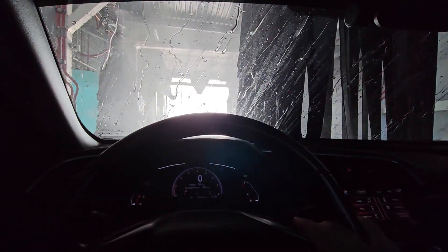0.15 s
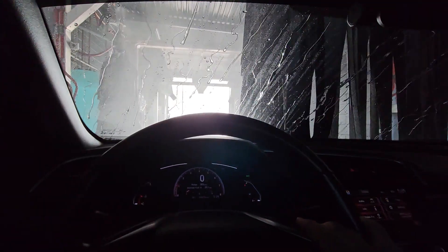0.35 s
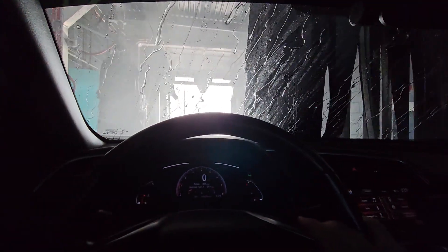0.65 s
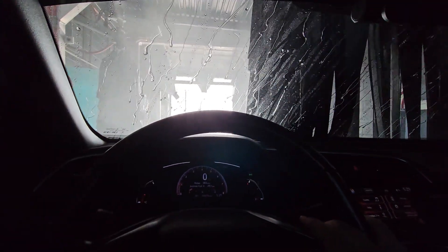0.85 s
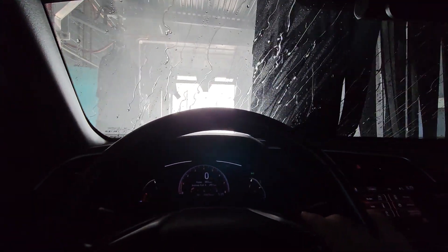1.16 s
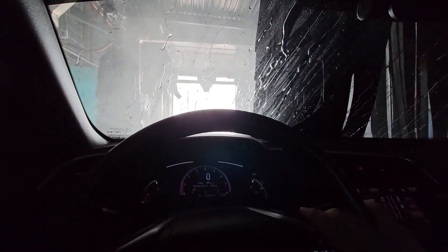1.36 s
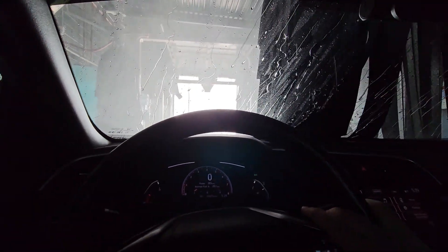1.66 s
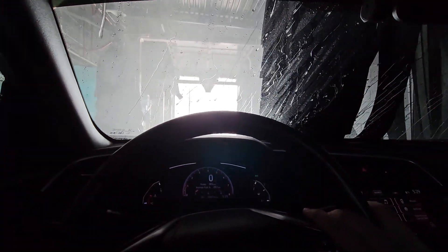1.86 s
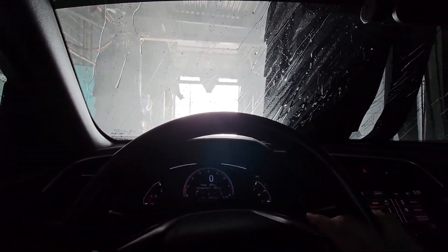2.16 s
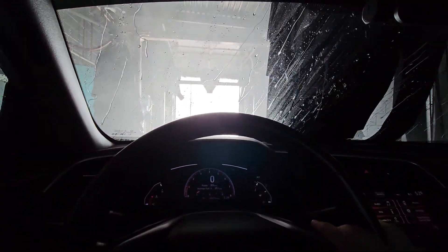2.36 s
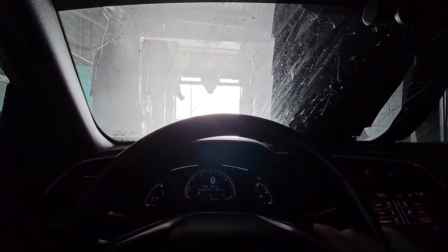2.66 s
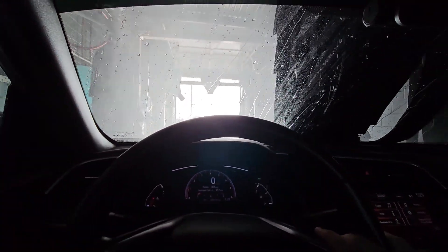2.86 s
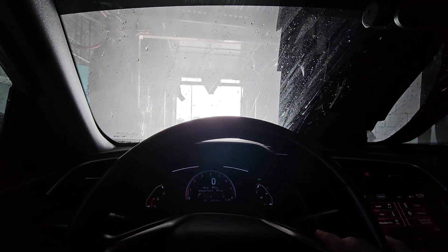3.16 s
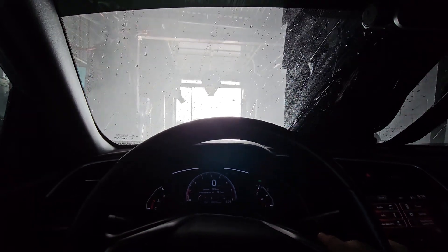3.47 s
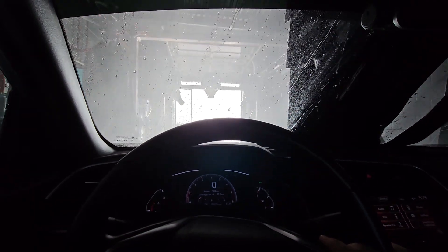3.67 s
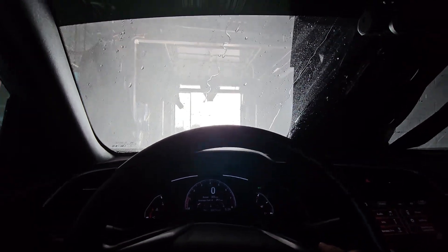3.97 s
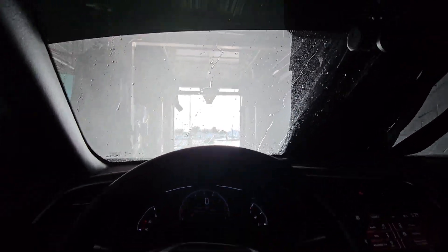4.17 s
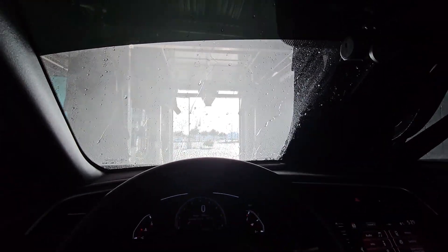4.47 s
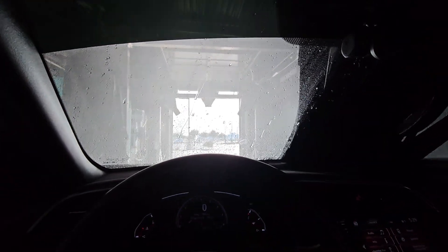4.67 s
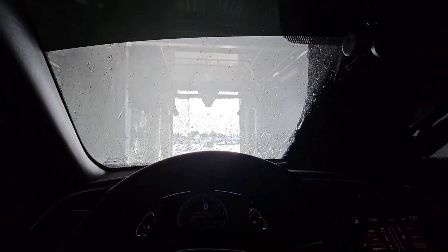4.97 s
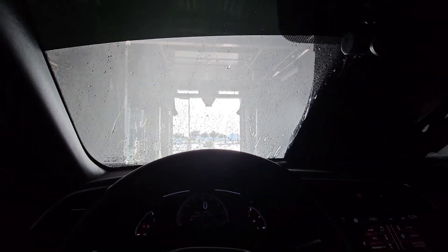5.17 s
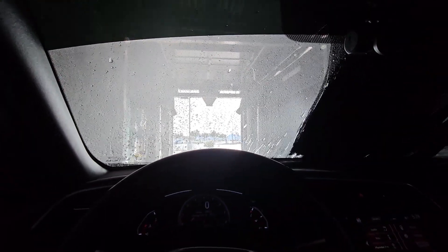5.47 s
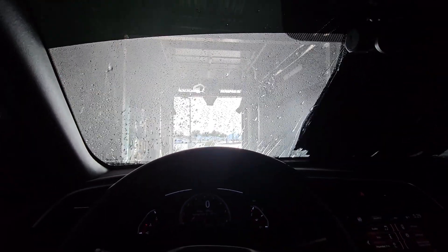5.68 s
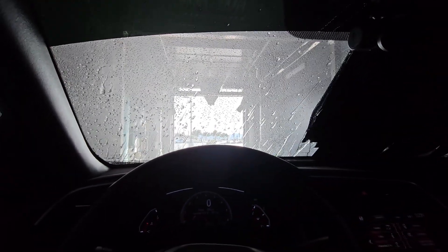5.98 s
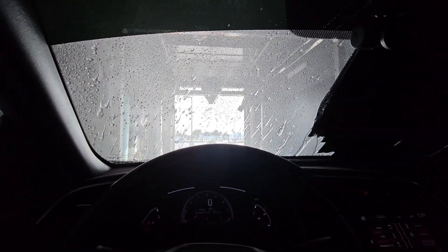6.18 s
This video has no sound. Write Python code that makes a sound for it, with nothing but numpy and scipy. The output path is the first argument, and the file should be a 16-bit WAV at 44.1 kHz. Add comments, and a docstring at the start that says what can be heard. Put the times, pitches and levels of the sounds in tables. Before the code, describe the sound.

A stereo microphone inside a parked car catches deep, rapid cloth beating that speeds up and slows, with swelling bass tones and a muffled wash bay. Thin bright spray passes over the windows in sweeps, and soft thuds become heavy wet slaps. A tiny squeak comes midway. Finally broadband blowers surge in and stay, with water spattering the car.

```python
"""Inside a closed car in an automatic wash. From the start cloth brushes beat on the body, speeding up and slowing
as periodic trains of strips; panels drone as swelling, sagging tones, cloth drags as filtered grains and the bay
splashes and hums. Soon jets of filtered spray sweep over the glass and drops tick on it as short noise bursts.
Then single wet strips slap the panels and excite their modes, and wet cloth squeaks once as a wavering tone.
Towards the end the car rolls under the dryer blowers, whose turbulent roar and water patter build and stay."""
import sys
import numpy as np
from scipy import signal
from scipy.fft import rfft, irfft, next_fast_len
from scipy.io import wavfile
from scipy.ndimage import uniform_filter1d

SR = 44100
rng = np.random.default_rng(int(sys.argv[2]) if len(sys.argv) > 2 else 0)


def int16_out(signal):
    """Quantize to a 16-bit WAV file."""
    q = np.round(np.clip(np.atleast_2d(signal).T, -1, 1) * 32767)
    wavfile.write(sys.argv[1], SR, q.astype(np.int16))


N = 278712
T = np.arange(N) / SR
BINS = np.maximum(np.fft.rfftfreq(N, 1 / SR), 1)
PITCH_WAVER = .012  # rms, as a fraction of the pitch


def undb(db):
    """Logarithmic level: decibels to amplitude gain."""
    return 10 ** (np.asarray(db) / 20)


def unit(x):
    """Normalisation: scale to rms 1."""
    return x / np.sqrt(np.mean(x ** 2))


def ease(u):
    """Raised-cosine onset: a smooth step from 0 to 1."""
    return np.sin(np.pi / 2 * np.clip(u, 0, 1)) ** 2


def fade(t, t60):
    """Exponential damping: falls by 60 dB in t60 seconds."""
    return np.exp(-np.log(1000) * t / t60)


def curves(rows):
    """Linear interpolation: each column of a time table, per sample."""
    s, *columns = np.transpose(rows)
    return [np.interp(T, s, c) for c in columns]


def read(points, hz):
    """Logarithmic frequency scale: interpolate a frequency table along it."""
    f, value = np.transpose(points)
    return np.interp(np.log(hz), np.log(f), value)


def colour(x, points):
    """Spectral shaping: filter by a (Hz, dB) curve."""
    size = next_fast_len(N + 4096)
    hz = np.maximum(np.fft.rfftfreq(size, 1 / SR), 1)
    return irfft(rfft(x, size) * undb(read(points, hz)), size)[..., :N]


def resonate(x, peaks):
    """Resonance: filter by bell-shaped (Hz, width Hz, dB) peaks."""
    db = sum(peak_db / (1 + (2 * (BINS - hz) / width) ** 2) for hz, width, peak_db in peaks)
    return irfft(rfft(x) * undb(db), N)


def band(x, lo_hz, hi_hz):
    """Band limitation: a steep band-pass."""
    limits = [lo_hz, min(hi_hz, SR / 2 - 1000)]
    return signal.sosfilt(signal.butter(3, limits, "band", fs=SR, output="sos"), x)


def walk(rate):
    """Slow random modulation: levels held 1 / rate s and smoothed twice, rms 1."""
    hold = int(SR / rate)
    steps = np.repeat(rng.standard_normal(N // hold + 1), hold)
    smooth = uniform_filter1d(uniform_filter1d(steps, hold), hold)
    return unit(smooth[:N])


def patter(rate, spread_db):
    """Random impulse train in two channels: a few impacts stand out (or are weak, if the spread is negative)."""
    size = undb(spread_db * np.minimum(rng.exponential(size=(2, N)), 5))
    struck = rng.random((2, N)) < rate / SR
    return unit(struck * size * rng.choice([-1, 1], (2, N)))


def add(out, s, sound):
    """Superposition: mix a sound in at time s."""
    i = int(s * SR)
    out[:, i:i + sound.shape[-1]] += sound[..., :N - i]


# likeness of the sound at the two ears: hz [Hz], correlation [-1 to 1]
EAR_LIKENESS = [(60, 0.81), (150, 1), (300, 0.69), (650, 0.77), (1350, 0.28), (2500, 0.0063), (5000, 0.011),
                (15000, 0)]
RIGHT_LAG_MS = 0.342  # the near window is on the left, so the right ear hears later


def diffuse(pair):
    """Diffuse field: two unrelated sounds mixed to a set correlation at each frequency, a little late on the right."""
    size = next_fast_len(N)
    hz = np.maximum(np.fft.rfftfreq(size, 1 / SR), 1)
    alike = np.clip(read(EAR_LIKENESS, hz), -.99, .99)
    mid, side = rfft(pair, size) * np.sqrt([1 + alike, 1 - alike])
    late = np.exp(-2j * np.pi * hz * RIGHT_LAG_MS / 1000)
    return irfft(np.array([mid + side, (mid - side) * late]), size)[:, :N]


def cabin(x, t60, wet_db):
    """Early reflections from glass and trim: a decaying echo that ripples the treble differently at each side."""
    t = T[:SR // 5]
    echo = band(rng.standard_normal((2, len(t))), 1000, 16000) * fade(t, t60)
    echo *= undb(wet_db) / np.sqrt(np.sum(echo ** 2, axis=1, keepdims=True))
    return x + signal.fftconvolve(np.atleast_2d(x), echo, axes=1)[:, :N]


def ring(modes, t, press, ring_db, scatter):
    """Modal excitation: modes swell while a strip presses on, then ring weakly; each blow weights them anew."""
    hz, t60, db = np.transpose(modes)[:, :, None]
    detune, weight, start = rng.standard_normal((3, len(modes), 1))
    gain = undb(db + 2 * weight)
    u = t / press
    pressed = u ** 2 * np.exp(2 * (1 - u))
    ringing = undb(ring_db) * ease(u / 2) * fade(t, t60)
    phase = 2 * np.pi * hz * (1 + 0.022 * detune) * (t - press) + scatter * start
    wave = gain * (pressed + ringing) * np.sin(phase)
    return wave.sum(axis=0) / gain.sum()


# harmonics of the brush's beat: multiple, mean level_db [dB]
BEAT_HARMONICS = [(1, -2), (2, -19.5), (3, -19), (4, -21.5), (5, -23.5)]
# speed of the side brush: start_s [s], mean strip_rate_hz [strips per second, Hz]
BRUSH_SPEED = [(0, 41.54), (.25, 41.46), (.58, 38.23), (.8, 30.57), (1.3, 28.97), (1.65, 31.19),
               (1.95, 36.08), (2.15, 29.78), (2.95, 30.05), (3.17, 37.24), (3.5, 40.27), (3.85, 37.1),
               (4.0, 29.9), (4.4, 29.99), (4.65, 40.17), (5.25, 41.96), (5.75, 42), (6.0, 35.93),
               (6.32, 33.1)]
# how hard the side brush bears on the body: start_s [s], level_db [dB, before the small lift below]
BRUSH_LOAD = [(0, -25), (.16, -26), (.33, -36), (.45, -44), (.5, -30), (.59, -28.5), (.75, -38),
              (1.0, -32.5), (1.12, -41.5), (1.55, -36), (2.0, -31.5), (2.25, -39.5), (2.38, -29.5),
              (2.5, -43), (2.75, -40.5), (3.05, -38.5), (3.2, -26.5), (3.27, -35), (3.43, -26.5),
              (3.61, -39), (3.69, -27.5), (3.86, -28), (4.0, -32.5), (4.15, -32.5), (4.3, -51), (4.5, -38),
              (4.56, -29.5), (4.75, -35.5), (4.87, -24.5), (5.05, -35), (5.25, -25.5), (5.36, -47),
              (5.45, -28), (5.5, -23), (5.58, -32.5), (5.78, -38), (5.93, -22.5), (6.1, -37), (6.32, -39)]
BRUSH_LIFT_DB, BRUSH_FLUTTER_DB = .5, 0.8


def brush():
    """Periodic impact: strips striking in quick, uneven succession give a harmonic series on the strip rate."""
    strip_hz, = curves(BRUSH_SPEED)
    load_db, = curves(BRUSH_LOAD)
    turn = 2 * np.pi * np.cumsum(strip_hz * (1 + 2 * PITCH_WAVER * walk(25))) / SR
    beat = np.zeros(N)
    for multiple, part_db in BEAT_HARMONICS:
        start_phase = rng.uniform(0, 2 * np.pi)
        beat += undb(part_db + walk(12)) * np.sin(multiple * turn + start_phase)
    return np.sqrt(2) * beat * undb(load_db + BRUSH_LIFT_DB + BRUSH_FLUTTER_DB * walk(26))


# panel drones: peak_s [s], length_s [s], pitch_hz at the peak [Hz], rise [Hz per s], level_db [dB, before the trim]
PANEL_DRONES = [(0.106, 0.46, 128.2, -1, -29), (0.759, 0.18, 125.5, 0, -37.5), (1.769, .6, 128.4, 0, -35.5),
                (2.32, .25, 140, -1.5, -37.5), (2.376, 0.15, 103.4, 0, -35.5),
                (2.792, .3, 129.2, 0.5, -35.5), (3.19, .16, 116.2, 29.5, -32.5),
                (3.419, 0.45, 123.8, 0, -30), (4.101, .4, 87.06, 0, -30), (4.33, .28, 112.2, 54.5, -29.5),
                (4.72, .3, 121.5, 44.5, -30), (5.058, 0.19, 115, 60, -30.5), (5.268, 0.27, 130, 45.5, -32)]
DRONE_SAG_HZ, DRONE_FADE_DB = 4, 9  # lower and weaker by this much at either end
DRONE_TRIM_DB = -3.0


def drones():
    """Forced vibration: a brush leans in and lets go, and the panel's tone swells, glides, sags and wavers."""
    out = np.zeros(N)
    for s, length, top_hz, rise, db in PANEL_DRONES:
        slack = np.minimum((2 * (T - s) / length) ** 2, 10)
        hz = top_hz + rise * (T - s) - DRONE_SAG_HZ * slack
        phase = 2 * np.pi * np.cumsum(hz * (1 + PITCH_WAVER * walk(24.96))) / SR
        out += undb(db - DRONE_FADE_DB * slack) * np.sin(phase)
    return np.sqrt(2) * out * undb(DRONE_TRIM_DB + walk(21.96))


# cloth dragging over the body: start_s [s], level_db [dB, before the lift below]
DRAG_LEVEL = [(0, -47.5), (.45, -36), (.62, -41), (1.25, -37), (1.8, -40.5), (2.15, -39), (2.38, -38),
              (2.6, -40), (2.9, -35.5), (3.55, -43.5), (4.05, -35.5), (4.35, -37.5), (5.0, -39),
              (5.5, -37.5), (5.7, -39), (6.14, -39.5), (6.3, -27.5)]
# where the cloth drags, soon mostly on the right, at last in the middle: start_s [s], left_minus_right_db [dB]
DRAG_SIDE = [(0, 4), (.4, -6.5), (.9, -0.5), (1.2, -4.5), (2.6, -3.5), (3.2, -1.5), (6.32, 0)]
# spectrum of dragging cloth: hz [Hz], density_db [dB per Hz]
DRAG_COLOUR = [(18, -7), (30, -4.5), (50, 7.5), (70, 2.5), (90, 3), (125, 0), (150, -4), (185, -5),
               (230, -13), (300, -27), (600, -76)]
DRAG_LIFT_DB, DRAG_FLUTTER_DB, DRAG_FLUTTER_RATE_HZ = 2.5, 2.5, 14


def drag():
    """Sliding friction: grains of contact of heavy wet cloth, low-passed to a dull, fluttering rumble."""
    db, = curves(DRAG_LEVEL)
    side_db, = curves(DRAG_SIDE)
    flutter_db = DRAG_FLUTTER_DB * walk(DRAG_FLUTTER_RATE_HZ)
    rumble = unit(colour(diffuse(patter(rate=900, spread_db=2.5)), DRAG_COLOUR))
    balance_db = np.array([side_db, -side_db]) / 2
    return rumble * undb(db + DRAG_LIFT_DB + flutter_db + balance_db)


# panel modes, shared with the slaps: pitch_hz [Hz], t60_s [s], mean level_db [dB]
PANEL_MODES = [(249, 0.1, -6), (312, 0.2, -4.5), (367, 0.15, 2), (410.5, 0.14, 2.5), (457, 0.099, 5),
               (493, 0.12, -7.5), (576, 0.1, -7), (691, 0.2, -11), (809, 0.098, -4.5)]
# noise of the wash bay: start_s [s], level_db [dB]
BAY_LEVEL = [(0, -49), (1.1, -46.5), (1.45, -48.5), (3.1, -48.5), (3.75, -50), (4.4, -48.5), (6.32, -50)]
FLAPS_DB = -10.5  # against the bay noise


def flaps():
    """Convolution of random impulses with panel modes: loose strip ends tap between the heavy slaps."""
    t = T[:SR // 4]
    taps = patter(rate=55, spread_db=2.5)
    rung = []
    for side in taps:
        panel = ring(PANEL_MODES, t, press=0.0041, ring_db=-3, scatter=2.33)
        rung.append(signal.fftconvolve(side, panel)[:N])
    db, = curves(BAY_LEVEL)
    return unit(diffuse(np.array(rung))) * undb(db + FLAPS_DB)


# spectrum of the bay through closed windows: hz [Hz], density_db [dB per Hz]
HALL_COLOUR = [(100, -13), (190, 4.5), (290, -0.5), (380, -1), (490, -4), (580, -7), (780, -5),
               (1050, -12.5), (1900, -15.5), (2600, -23.5), (4500, -25.5), (6000, -53.5), (10000, -44.5),
               (15500, -37.5)]
# resonances of the cabin and its windows, shared with the blowers: hz [Hz], width_hz [Hz], gain_db [dB]
WINDOW_RESONANCES = [(192.6, 7, 5), (368, 11, 2), (501, 35, 8), (665, 17, 3.5), (1187, 63, -3),
                     (1290, 140, 4.5), (1586, 210, 4), (1730, 200, -2), (1940, 230, 3.5)]


def hall():
    """Transmission loss: splashing in the wash bay, dulled by the closed windows and coloured by resonance."""
    db, = curves(BAY_LEVEL)
    splash = diffuse(cabin(patter(rate=7000, spread_db=2.0), t60=0.2, wet_db=-6.5))
    return unit(resonate(colour(splash, HALL_COLOUR), WINDOW_RESONANCES)) * undb(db + walk(9.06))


# hum of a pump: start_s [s], mean level_db [dB]
PUMP_LEVEL = [(0, -52), (.5, -64.5), (1.25, -54.5), (1.4, -67), (2.9, -55), (3.7, -72), (5.3, -65),
              (6.32, -51)]
PUMP_HZ = 375.5  # mean pitch


def pump():
    """Tonal machine noise: one sine through the closed windows, unsteady in pitch and level."""
    db, = curves(PUMP_LEVEL)
    hz = PUMP_HZ * (1 + 0.0147 * walk(30) + 0.01196 * walk(5))
    turn = 2 * np.pi * np.cumsum(hz) / SR
    return np.sqrt(2) * np.sin(turn) * undb(db + 2.55 * walk(15))


# jets over the glass: start_s [s], attack_s [s], end_s [s], level_db [dB, before the lift], squareness [0-1]
JET_SWEEPS = [(.62, 0.59, 1.176, -61.5, 0.6), (1.42, 0.35, 1.93, -68.5, .37), (2.41, 0.2, 2.878, -57.5, 1),
              (3.08, .22, 3.58, -70.5, 0.1), (3.88, 0.21, 4.8, -71.5, 0.5), (4.46, 0.19, 4.7, -62.5, 0.4),
              (4.8, .3, 6.8, -63.5, 0.18)]
# spectrum of the spray: hz [Hz], density_db [dB per Hz]
JET_COLOUR = [(800, -10), (2000, 8.5), (3200, 1.5), (4200, 5.5), (5000, 6.5), (6000, -4), (7300, -1),
              (9000, -3.5), (10300, -7), (11400, 2), (12400, -5), (13200, -7), (15500, 0)]
# ring of the glass where the jets strike: hz [Hz], width_hz [Hz], gain_db [dB]
GLASS_RESONANCES = [(4850, 220, 6), (5300, 200, 2.5), (5700, 230, -5), (6120, 170, 5), (7100, 450, 3),
                    (8550, 270, 2), (12400, 400, -3), (13500, 400, 4), (13950, 300, -3), (14700, 700, 3)]
SWEEP_RELEASE_S, SWEEP_LIFT_DB = 0.14, 1.5
MIST_DB = -75  # mist wets the glass between sweeps
JET_RIGHT_DB = 1  # a square hit lands right of the driver


def jets():
    """Droplet impact noise: spray swells as a jet nears and is cut off; it sputters, and a square hit rings the glass."""
    drumming = patter(rate=3500, spread_db=1.0) * undb(.5 * walk(24.92) + 1.2 * walk(70))
    spray = unit(colour(cabin(drumming, t60=0.048, wet_db=2.0), JET_COLOUR))
    rung = unit(resonate(spray, GLASS_RESONANCES)) * undb(JET_RIGHT_DB * np.array([[-.5], [.5]]))
    out = undb(MIST_DB) * spray
    for start, attack, end, db, square in JET_SWEEPS:
        flow = ease((T - start) / attack) * (1 - ease((T - end) / SWEEP_RELEASE_S))
        square = np.clip(square, 0, 1)
        strike = square * rung + (1 - square) * spray
        out = out + undb(db + SWEEP_LIFT_DB) * flow * strike
    return out


# fat drops on the glass: start_s [s], level_db [dB, before each part's offset], pitch_hz [Hz], t60_s of the fizz [s]
GLASS_DROPS = [(.620, -65, 5360, 0.093), (.675, -70, 7040, .1), (.712, -47.5, 2850, 0.043),
               (0.715, -63, 3930, 0.097), (.755, -73, 8400, .14), (1.355, -71, 8300, 0.097),
               (2.267, -64, 5250, 0.11), (2.303, -63.5, 6630, 0.11), (3.868, -71, 8190, 0.071),
               (4.024, -52, 4150, 0.079), (4.141, -52, 12530, .015), (4.258, -47, 1490, 0.048),
               (4.415, -63, 12000, .02), (4.733, -57, 15000, 0.037), (4.753, -61, 8480, 0.063),
               (4.977, -54, 14760, 0.027), (5.161, -58, 11510, 0.038)]


def drops():
    """Transient noise bursts: fizz around each drop's pitch, a wider snap, and a sharp tick just after the onset."""
    t = T[:SR // 8]
    out = np.zeros((2, N))
    for s, db, hz, t60 in GLASS_DROPS:
        noise = rng.standard_normal((3, 2, len(t)))
        fizz = unit(band(noise[0], hz / 1.07, hz * 1.06)) * fade(t, t60)
        snap = unit(band(noise[1], hz / 2, hz * 1.23)) * fade(t, 0.97 * t60)
        tick = unit(band(noise[2], 4000, 16000)) * fade(t, .008)
        onset = 1 - fade(t, 0.0047)
        add(out, s, undb(db) * onset * (undb(1.2) * fizz + undb(4.0) * snap))
        # higher drops tick harder
        add(out, s + 0.0018, undb(db - 6.0) * hz / 12000 * tick)
    return out


# wet strips slapping the body: start_s [s], press_s (time pressing on) [s], slap_db [dB], thud_db [dB],
# thud_hz [Hz], splash_db [dB], left_minus_right_db of slap and thud [dB]
STRIP_SLAPS = [(1.227, 0.0124, -51, -26.5, 108, -64, -10), (1.742, 0.0089, -32, -27, 128, -51, -2),
               (1.89, 0.0096, -54, -42, 111, -70, -2), (2.110, 0.00893, -32, -44, 131, -50.5, -1),
               (2.348, 0.0138, -59, -30, 100.4, -68, -11), (2.552, .013, -29, -32, 129.7, -68, 1),
               (2.639, .014, -30.5, -47, 128.4, -53, 1), (2.913, 0.0121, -34.5, -44, 129.2, -64, 4),
               (3.005, 0.0118, -48, -30, 134, -70, 0), (3.302, 0.0093, -29.5, -32.5, 166, -70, -3),
               (3.689, 0.01142, -62, -30, 116.5, -72, -11.5), (3.931, .012, -45, -21, 86, -74, 1),
               (4.020, 0.0071, -23.5, -18, 108, -45, 1), (4.045, 0.00905, -32.5, -36, 120, -58, -2),
               (4.085, .012, -52, -30, 87.6, -68, 3), (4.150, 0.01304, -30, -16, 90.7, -62, 2),
               (4.205, 0.01127, -41, -20.5, 102, -68, 1), (4.256, 0.0038, -43, -29, 130, -47, 2),
               (4.375, .012, -41, -36, 118, -47, 2), (4.42, 0.0079, -37, -41, 121.2, -46, 0),
               (4.442, 0.0055, -39, -23, 107, -53, 0.5), (4.546, 0.00503, -27, -27, 116, -42.5, 1),
               (4.561, 0.0089, -35.5, -20.5, 86, -47, 1.5), (4.96, 0.0091, -34, -42, 120.1, -52, 0),
               (4.986, .006, -25, -19.5, 121.2, -53, 2), (5.012, 0.01097, -29, -26, 155, -58, 1),
               (5.419, 0.00722, -29, -24, 150.4, -43, 3), (5.443, .007, -29, -30, 119.6, -48, 2),
               (5.492, 0.0031, -23.5, -20, 151, -35, 0), (5.503, .004, -27.5, -20.5, 129, -47, 0.5),
               (5.85, .014, -52, -24, 90, -66, 0), (6.217, 0.00714, -32, -22.5, 89.5, -58, 0),
               (6.245, 0.0092, -37, -23, 130, -61, 0), (6.304, 0.0072, -29, -21.5, 91, -48, 0)]
# boom of a large panel: multiple of the thud pitch, t60_s [s], mean level_db [dB]
BOOM_MODES = [(.8, 0.13, -1.5), (1, 0.18, 7.5), (1.28, 0.1, -9.5)]
# spectrum of the strip sliding on: hz [Hz], density_db [dB per Hz]
RUB_COLOUR = [(120, -17), (240, 5), (320, 5), (430, 2), (580, -0.5), (800, -9.5), (1100, -13.5),
              (2000, -24), (5000, -49)]
# spectrum of water splashing off: hz [Hz], density_db [dB per Hz]
SPLASH_COLOUR = [(300, -34), (700, 11.5), (1200, 3), (2000, -1.5), (3000, -12.5), (4500, -7.5),
                 (6000, -27.5), (15000, -37)]
SLAP_RING_DB, THUD_RING_DB = -4.5, -6.5  # what rings on once the strip lets go
THUD_SLOWNESS = 1.375  # the heavy panel answers this much more slowly
RUB_DB, RUB_T60_S = -19.5, 0.38  # level against the slap; the strip slides on after it lands
SPLASH_ATTACK_S, SPLASH_T60_S = .003, 0.096


def slaps():
    """Impact on a damped plate: the panel knocks, the body booms, water splashes off and the cloth rubs on."""
    t = T[:SR // 3]
    body, rubbing, splashing = np.zeros((3, 2, N))
    for s, press, slap_db, thud_db, thud_hz, splash_db, side_db in STRIP_SLAPS:
        knock = np.array([ring(PANEL_MODES, t, press, SLAP_RING_DB, scatter=1.0) for side in range(2)])
        boom_modes = [(k * thud_hz, t60, db) for k, t60, db in BOOM_MODES]
        boom = ring(boom_modes, t, THUD_SLOWNESS * press, THUD_RING_DB, scatter=0.45)
        balance = undb(side_db * np.array([[.5], [-.5]]))
        add(body, s, (undb(slap_db) * knock + undb(thud_db) * boom) * balance)
        contact = ease(t / press)
        add(rubbing, s, undb(slap_db + RUB_DB) * contact * fade(t, RUB_T60_S))
        add(splashing, s, undb(splash_db) * ease(t / SPLASH_ATTACK_S) * fade(t, SPLASH_T60_S))
    rub = unit(colour(patter(rate=1500, spread_db=1.5), RUB_COLOUR)) * undb(1.9 * walk(90))
    splash = unit(colour(patter(rate=5000, spread_db=-1.0), SPLASH_COLOUR))
    return body + diffuse(rub * rubbing + splash * splashing)


SQUEAK_S, SQUEAK_LENGTH_S, SQUEAK_HZ, SQUEAK_DB = 2.89, 0.096, 1900, -58.5  # mean pitch, peak level


def squeak():
    """Frictional tone: wet cloth squeaks briefly on the glass, a wavering sine under a half-sine swell."""
    swell = np.sin(np.pi * np.clip((T - SQUEAK_S) / SQUEAK_LENGTH_S, 0, 1))
    phase = 2 * np.pi * np.cumsum(SQUEAK_HZ * (1 + 0.00767 * walk(60))) / SR
    return undb(SQUEAK_DB) * swell * np.sin(phase)


# dryer air as the car rolls under it, shared with the spatter: start_s [s], level_db [dB]
AIR_LEVEL = [(0, -62), (3.9, -58.5), (4.3, -55), (5.15, -49), (5.35, -44.5), (5.5, -40), (6.0, -39.5),
             (6.32, -38)]
# spectrum of the dryer air: hz [Hz], density_db [dB per Hz]
AIR_COLOUR = [(90, 9.5), (175, 14.5), (260, 4.5), (370, 8), (560, -5), (760, 3.5), (1100, -10), (1350, -1),
              (2000, -2.5), (3300, -3), (4800, -9), (5700, -14.5), (10500, -19.5), (11400, -11.5),
              (12500, -17), (15500, -15.5)]


def blowers():
    """Turbulence noise: broadband air buffets the roof and screen and drives mist over the glass."""
    db, = curves(AIR_LEVEL)
    air = rng.standard_normal((2, N))
    buffet = band(air, 124, 1000) * undb(-7.5 + 0.97 * walk(22))
    mist = undb(-3.0) * patter(rate=4000, spread_db=3.0)
    roar = diffuse(cabin(air + buffet + mist, t60=0.15, wet_db=-9.0))
    return unit(resonate(colour(roar, AIR_COLOUR), WINDOW_RESONANCES)) * undb(db + 0.48 * walk(7.7))


# water flung at the car by the dryer air: low_hz [Hz], high_hz [Hz], level_db against the air [dB]
SPATTER_BANDS = [(256, 850, -12.5), (916, 2230, -12), (1970, 4720, -12.5)]
SPATTER_PATCHY_DB = 1.2


def spatter():
    """Random impacts in separate bands: the dryer air flings water at the car in a dense, gritty patter."""
    db, = curves(AIR_LEVEL)
    patches = np.zeros((2, N))
    for lo_hz, hi_hz, part_db in SPATTER_BANDS:
        grit = band(patter(rate=700, spread_db=2.5), lo_hz, hi_hz)
        patches += undb(part_db) * unit(grit * undb(SPATTER_PATCHY_DB * walk(28)))
    return diffuse(patches) * undb(db)


def scene():
    """Superposition: everything as it reaches the driver's seat."""
    cloth = brush() + drones() + drag() + flaps() + slaps() + squeak()
    water = hall() + pump() + jets() + drops()
    dryer = blowers() + spatter()
    return cloth + water + dryer


# tone of the two ears: hz [Hz], left_minus_right_db [dB]
EAR_TILT = [(60, 0.1), (200, 3.5), (380, -1.5), (700, 3.5), (1300, 3.5), (2400, 5), (4400, -1), (5000, 1.5),
            (5800, 7.5), (9000, 10.5), (10200, 2.5), (11400, 2), (12400, 7), (15500, 10.5)]
TOP_HZ = 15700


def record(dry):
    """Band limitation: the left is brighter than the right; the deepest bass and the top are cut."""
    ears = []
    for x, sign in zip(dry * ease(T / 0.0055), (1, -1)):
        ears.append(colour(x, [(hz, sign * db / 2) for hz, db in EAR_TILT]))
    ears = signal.sosfilt(signal.butter(2, 15, "high", fs=SR, output="sos"), np.array(ears))
    return signal.sosfilt(signal.ellip(12, .2, 70, TOP_HZ, fs=SR, output="sos"), ears)


dry = scene()
out = record(dry)
int16_out(out)
```